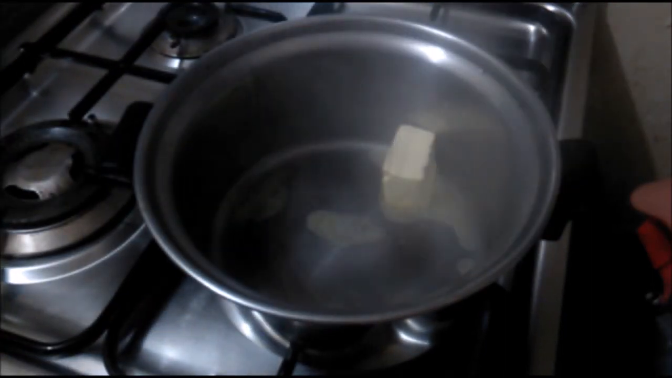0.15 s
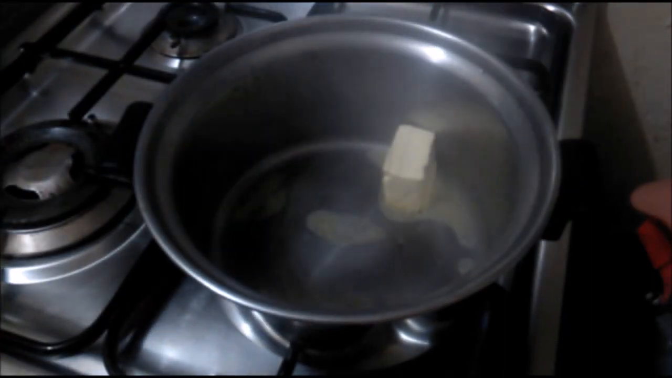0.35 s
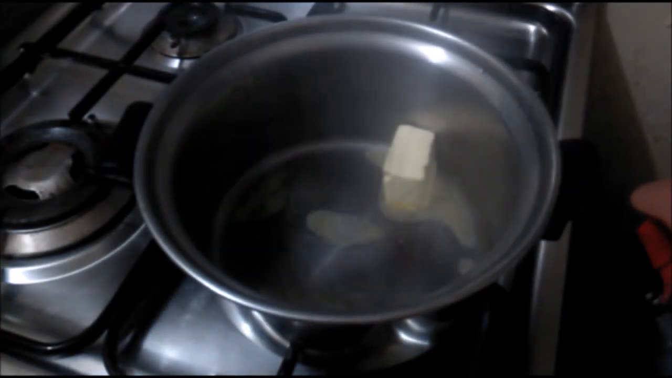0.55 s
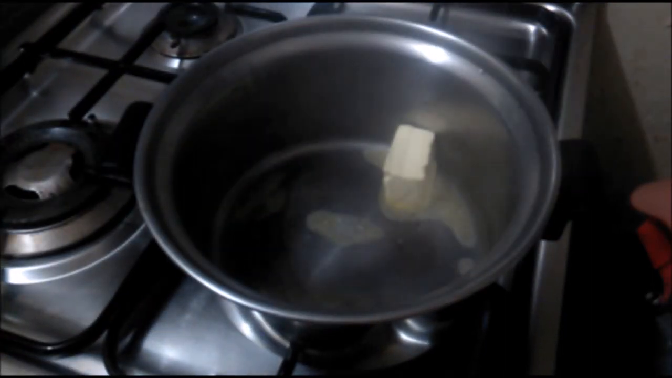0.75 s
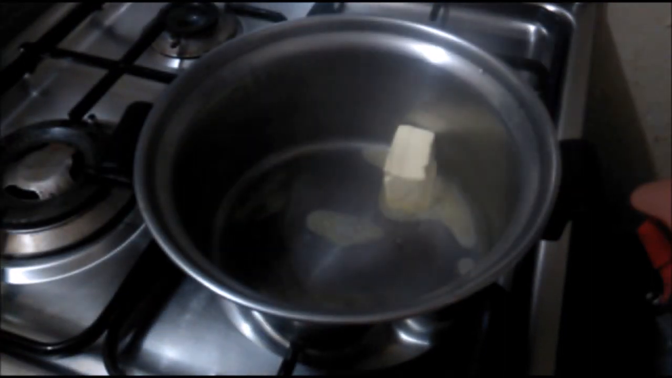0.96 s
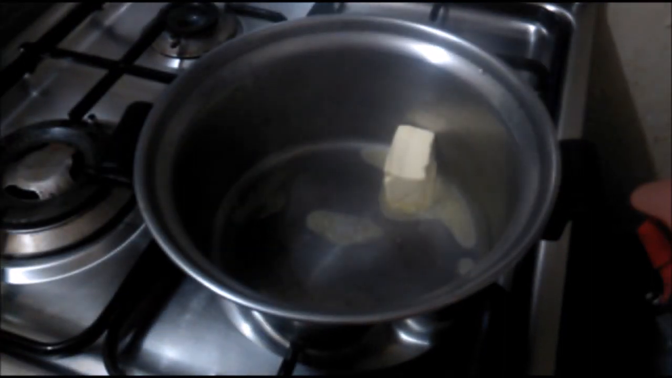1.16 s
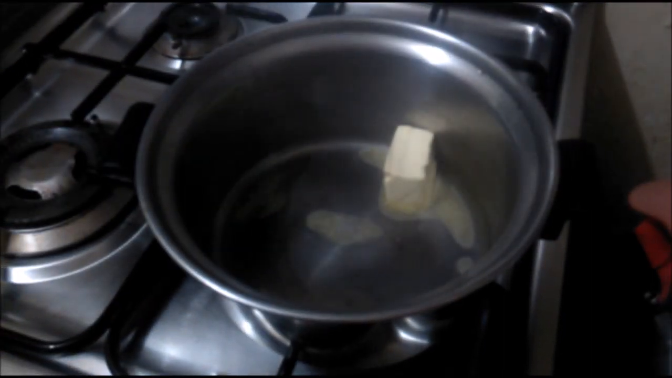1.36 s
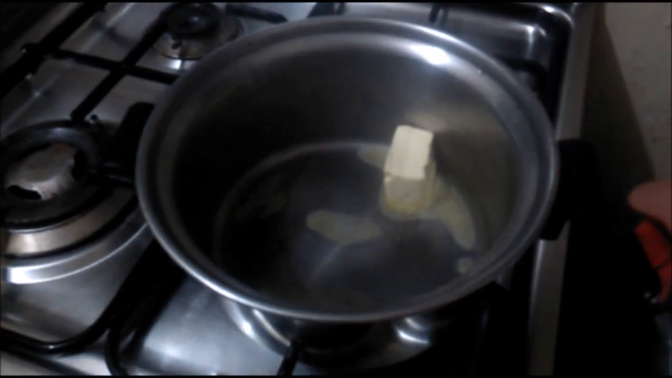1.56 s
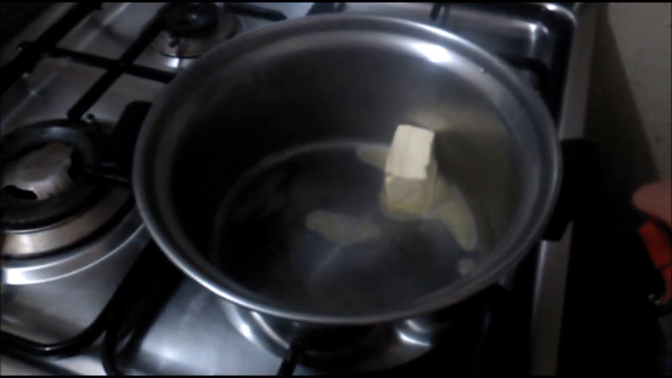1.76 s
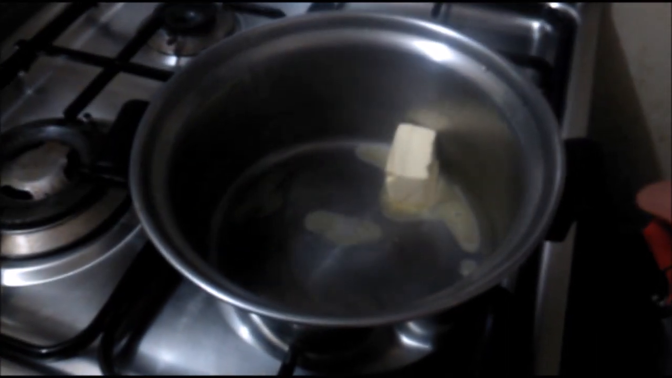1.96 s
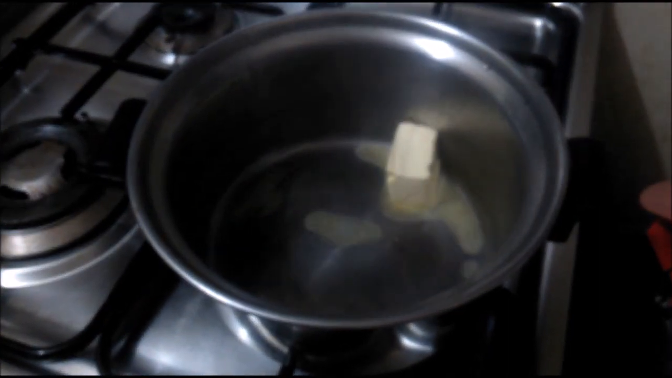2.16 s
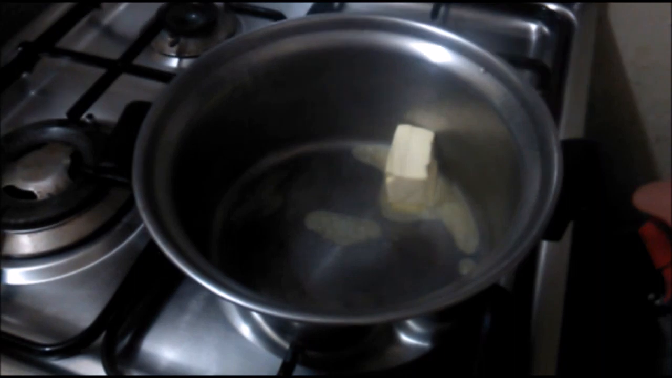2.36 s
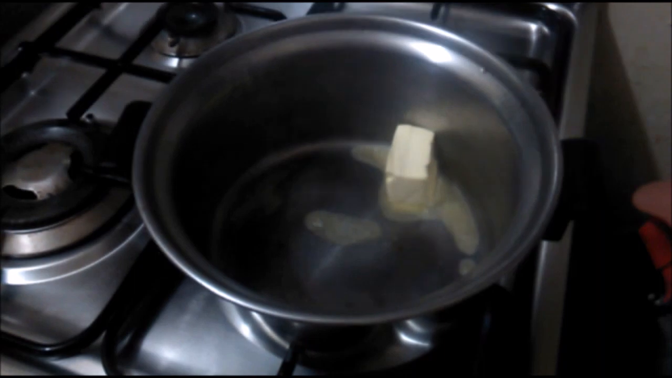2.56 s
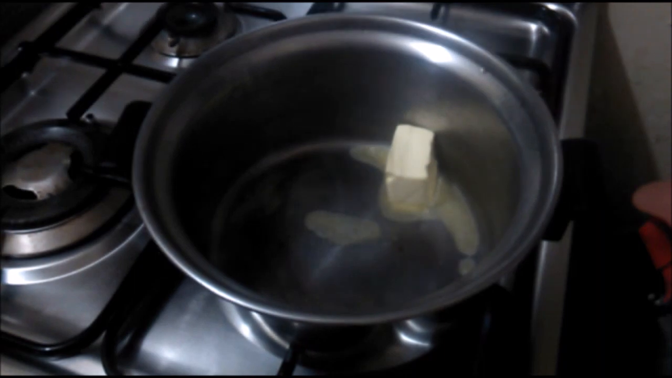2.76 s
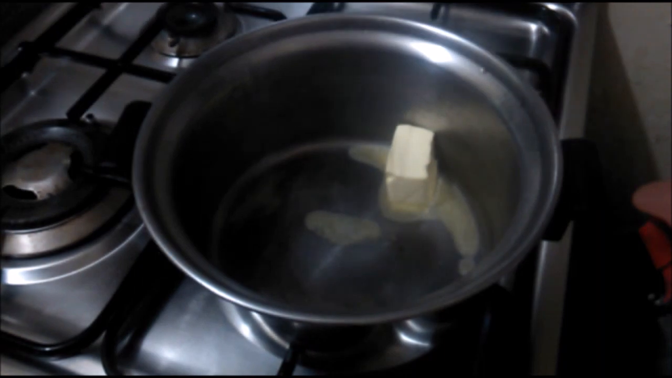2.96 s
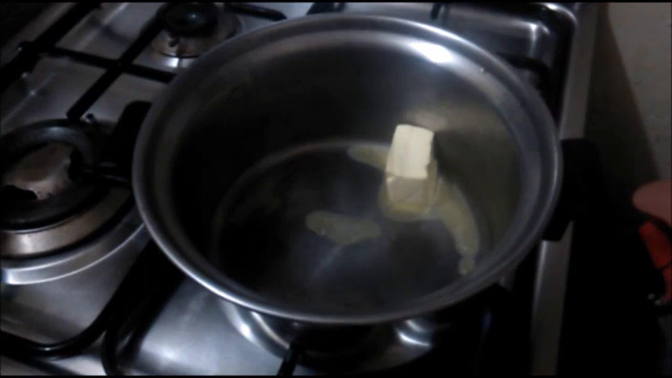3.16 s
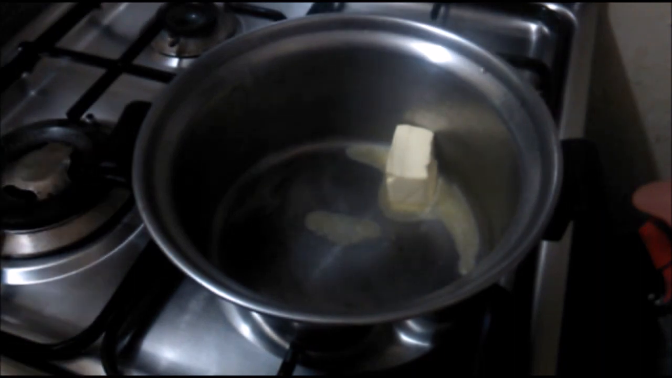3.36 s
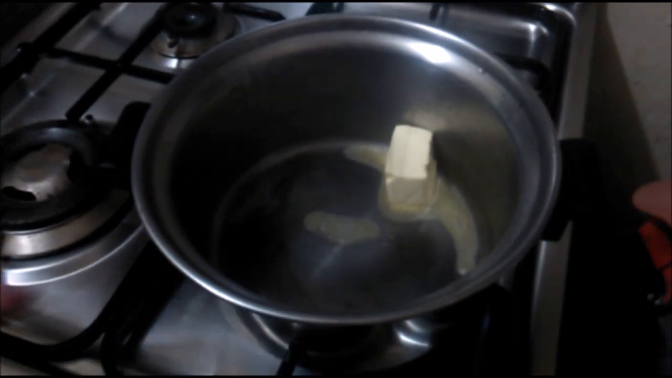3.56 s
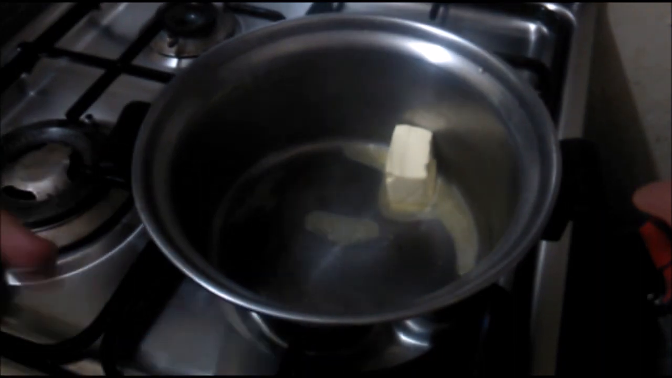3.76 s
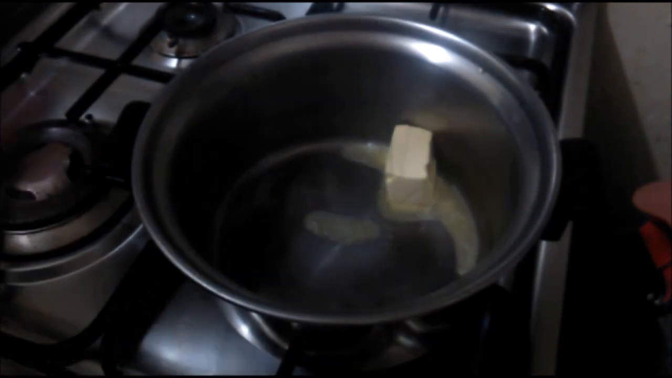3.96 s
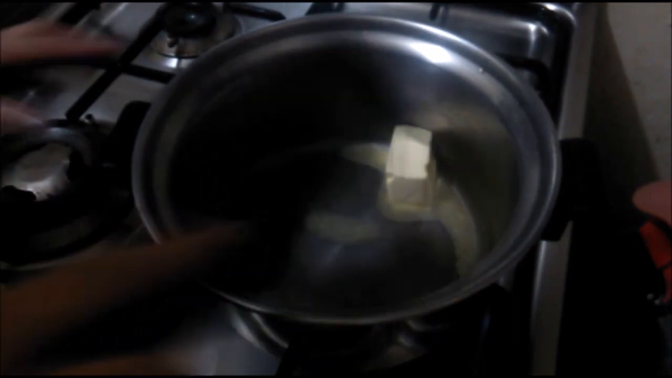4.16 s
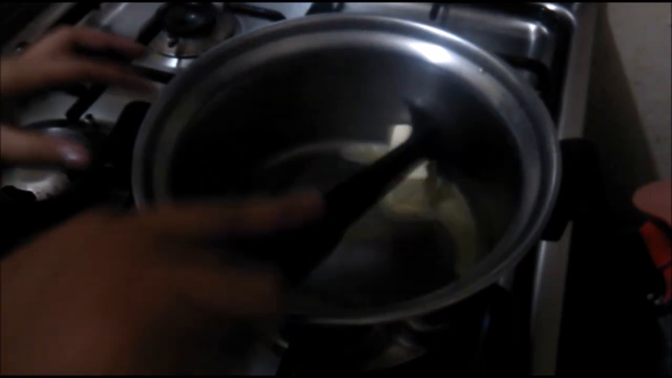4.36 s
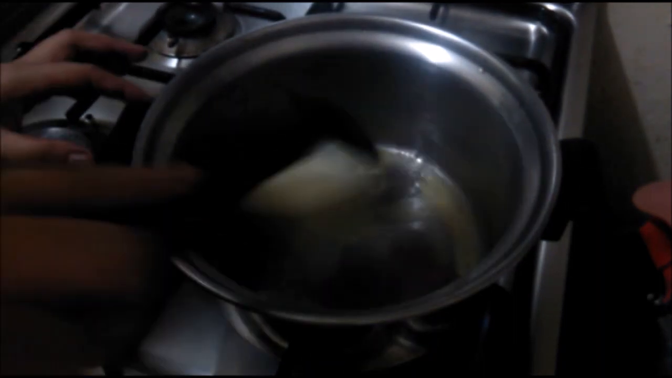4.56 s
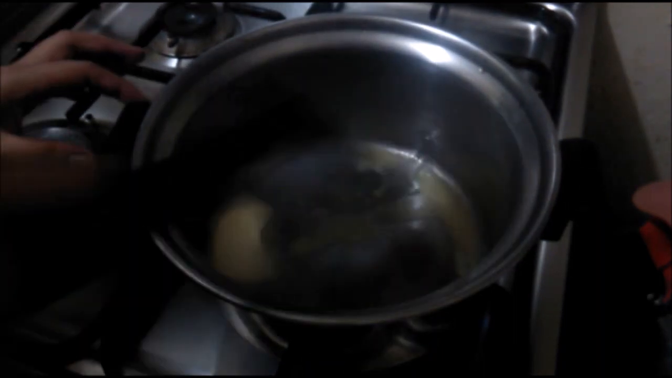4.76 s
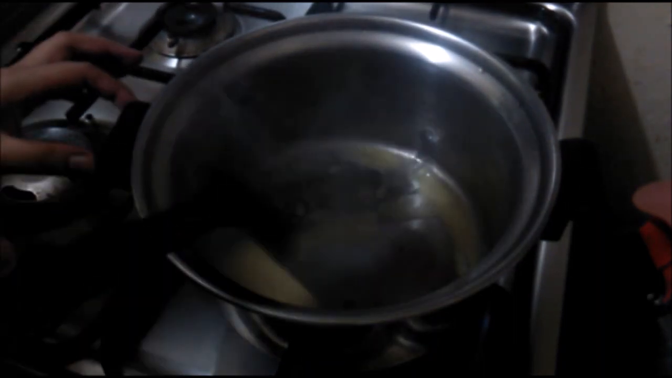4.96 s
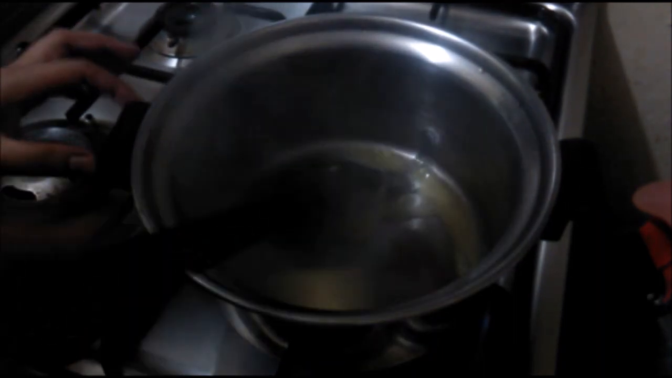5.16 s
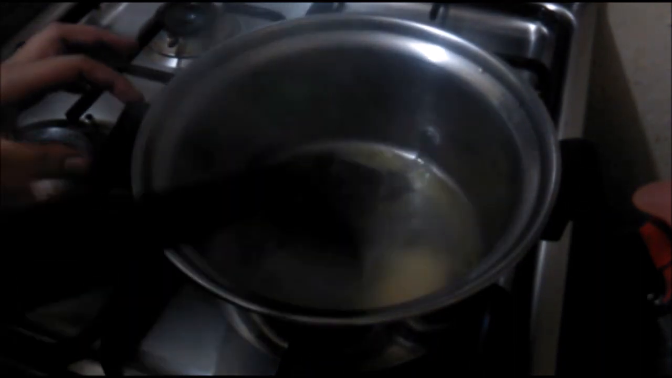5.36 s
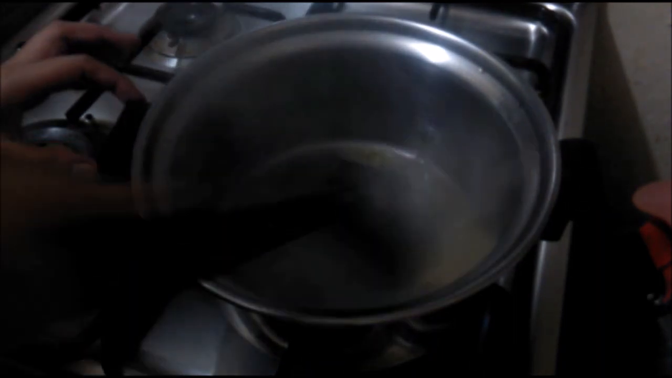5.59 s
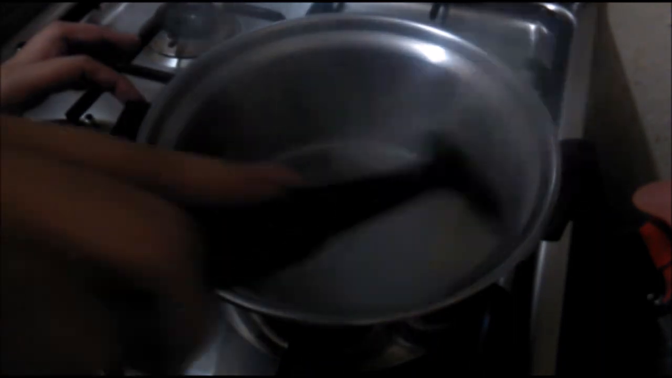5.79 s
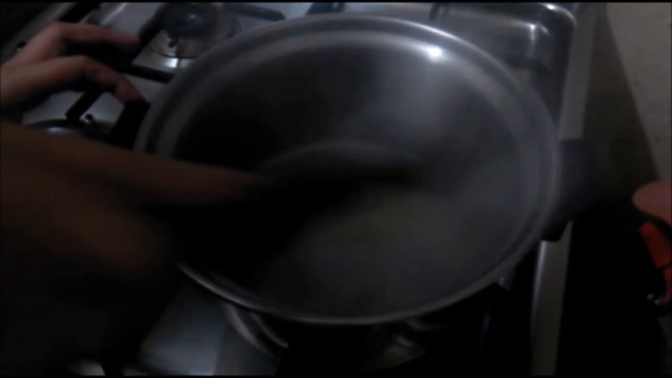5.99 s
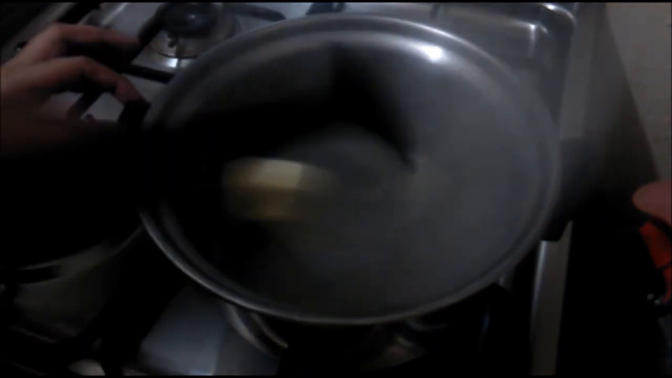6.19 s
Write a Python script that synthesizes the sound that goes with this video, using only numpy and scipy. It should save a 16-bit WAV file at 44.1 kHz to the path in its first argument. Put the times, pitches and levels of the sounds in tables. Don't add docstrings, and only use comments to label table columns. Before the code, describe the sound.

A thin, airy sizzle runs throughout, dotted with crackling pops and a few lower plops. Small counter noises interrupt: cloth rubbing, a metallic slide, hollow thumps. After four seconds the butter is pushed around and the frying surges; the spatula clanks and scrapes on hollow steel, then stirs softly. Close, dry mono kitchen sound with low room rumble and momentary dull, gritty dropouts from the camera.

```python
import sys
import numpy as np
from scipy import signal
from scipy.fft import rfft, irfft, next_fast_len
from scipy.io import wavfile
from scipy.ndimage import uniform_filter1d, map_coordinates

SR = 44100
rng = np.random.default_rng(int(sys.argv[2]) if len(sys.argv) > 2 else 0)


def pcm_store(signal):
    levels = np.round(np.clip(np.atleast_2d(signal), -1, 1) * 32767)
    wavfile.write(sys.argv[1], SR, levels.astype(np.int16).T)


def attenuation_scalar(level_db):
    decades = np.asarray(level_db, float) / 20
    return 10 ** decades


N = 274743

# [f/Hz, level/dB per Hz]
ROOM_COLOUR = [(13, -38), (22, -27), (70, -3), (119, -5), (143, -12.5), (167, -12.5), (197, -17),
               (262, -13.5), (360, -16), (411, -18), (584, -20), (982, -27), (1200, -44), (1560, -51),
               (2640, -120)]
# [f/Hz, level/dB]
FRIDGE_LINES = [(58.01, -58), (56.3, -59), (119.8, -53), (116.06, -58.5)]
BEAT_NULLS = [
    .59,
    .165,
]
# [t/s, f/Hz, level/dB]
PIPE_WHINE = [
    (.55, 253, -80),
    (.65, 265.7, -61),
    (.82, 265, -59),
    (.95, 295, -83),
]
# [t/s, peak level/dB, bass over it/dB, hollow note f/Hz]
THUDS = [(0.788, -48.5, 10.5, 272), (2.811, -34.5, -6, 300), (2.838, -40, -1, 496), (2.89, -44.5, -4, 530),
         (2.919, -46, 1, 312), (3.162, -43, 3, 620), (3.198, -50, -8, 700), (3.249, -50, -2, 473),
         (4.48, -44.5, 6, 514), (4.554, -34.5, -19, 348), (4.579, -41.5, -17, 458), (4.69, -37.5, 3.5, 480),
         (4.807, -52, 14, 574), (5.3, -46, 2, 326), (5.398, -24.5, -11, 310), (5.497, -35.5, -1.5, 322),
         (5.74, -34, -17, 177), (5.759, -43.5, 6.5, 507), (5.797, -44, 8.5, 161), (5.85, -38, -4, 323),
         (5.889, -43, 2, 315), (6.195, -34, -16, 316)]
# [f/Hz, level/dB per Hz]
THUD_COLOUR = [(120, -42), (230, -21), (300, -5.5), (550, -1), (1000, -8.5), (2500, -22), (4000, -23)]
# [t/s, level/dB]
RUBS = [
    [(0.2, -64), (0.212, -49), (0.276, -53), (0.284, -58), (0.344, -48.5), (0.37, -56)],
    [(0.77, -49), (0.782, -33), (0.816, -34), (0.832, -41.5), (0.84, -58), (0.89, -49), (0.92, -52)],
]
# [f/Hz, width/Hz, level/dB]
CLOTH = [(1260, 500, -4), (2500, 360, 3.5), (3150, 640, 0)]
# [f/Hz, width/Hz, level/dB]
CUTLERY = [(770, 33, -16), (1132, 52, -12), (1420, 66, -2), (1480, 33, -11), (1850, 930, -21),
           (2290, 38, -6.5), (2500, 81, -2), (3050, 7.5, 8), (2950, 20, 5), (2820, 1300, -9.5),
           (3620, 71, -8.5), (6230, 170, -12)]
# [f/Hz, level/dB, t60/s]
POT_MODES = [(308, -19, 0.086), (330, -8, .28), (514, -17, 0.19), (774, -7, 0.095), (906.5, -3.5, 0.078),
             (1030, 3, 0.12), (1160, -8, 0.151), (1280, -8, 0.1), (1410, -35, .08), (1696, -5.5, 0.065),
             (1820, -14, 0.16), (2060, -13, 0.047), (2355, -20, .15)]
# [t/s, peak level/dB, note favoured by the spot struck f/Hz]
KNOCKS = [(4.557, -51, 400), (4.667, -23.5, 328), (4.7, -37, 1180), (4.83, -39, 1170), (4.49, -52, 1290),
          (5.14, -42, 1300), (5.351, -27, 1030), (5.373, -22.5, 1030), (5.373, -35, 330),
          (5.399, -22.5, 1060), (5.402, -18, 1750), (5.417, -27, 1040), (5.43, -26, 900),
          (5.433, -28, 1780), (5.438, -30, 325), (5.4926, -34, 1030), (5.515, -33.5, 1030),
          (5.849, -44, 330), (6.196, -39.5, 330)]
# [t/s, level/dB]
DRAG = [
    (5.33, -52),
    (5.38, -41),
    (5.416, -32),
    (5.452, -36),
    (5.464, -45),
    (5.5, -51),
]
# [t/s, level/dB]
STIR = [(4.45, -77), (4.5, -57), (4.85, -56.5), (4.95, -56.5), (5.1, -65.5), (5.3, -49.5), (5.6, -55.5),
        (5.9, -56.5), (6.23, -68)]
# [f/Hz, level/dB per Hz]
GRIT_COLOUR = [(200, -29), (500, -5), (1000, 4), (1400, 6), (2200, -14), (3200, -8), (5000, -54)]
# [t/s, peak level/dB, pitch f/Hz]
SPITS = [(0.1414, -28.5, 7570), (0.4643, -26.5, 6940), (0.4844, -29.5, 7620), (0.8964, -31, 6400),
         (1.1894, -37, 5100), (1.3794, -35, 7880), (1.5344, -31, 5100), (1.563, -31.5, 5250),
         (1.6094, -35, 4300), (1.6394, -36.5, 4450), (1.7504, -28.5, 7300), (1.8994, -29.5, 7100),
          (2.354, -33.5, 5110), (2.491, -35, 5260), (2.593, -23.5, 9300), (2.5986, -36.5, 5150),
         (2.7343, -34, 5370), (2.838, -34, 7500), (3.1264, -28, 6900), (3.1349, -29, 7090),
         (3.129, -37, 5040), (3.3069, -34.5, 4420), (3.4166, -30, 7710), (3.436, -30, 6000),
         (3.4675, -28, 7920), (3.5728, -40, 7610), (4.043, -46, 5080), (4.5035, -22.5, 7250),
         (5.4894, -34, 5190), (5.5766, -31, 5270)]
# [t/s, peak level/dB, pitch f/Hz]
PLOPS = [(1.712, -38.5, 1930), (2.0082, -42, 2410), (2.1695, -43, 3370), (2.2, -36, 2370),
         (2.605, -42, 2160), (2.809, -42, 2110), (2.9997, -46, 1850), (3.0194, -45, 1840),
         (3.269, -38, 3060), (3.3064, -46, 2280), (3.3618, -40, 3360), (3.546, -59, 1960),
         (4.7194, -37, 1680), (5.997, -38, 1920)]
# [t/s, fizz level/dB]
BOIL = [(0.0, -35.5), (0.22, -34.5), (1.3, -35), (1.42, -32), (1.49, -35), (2.2, -35), (2.27, -37.5),
        (2.62, -35), (2.69, -36.5), (3.52, -33.5), (4.44, -35.5), (4.67, -24.5), (5.24, -28), (5.29, -25),
        (5.81, -29.5), (6.07, -28.5), (6.14, -26.5), (6.23, -27)]
# [f/Hz, level/dB per Hz]
FIZZ_COLOUR = [(3530, -38), (6000, -18), (8570, -11.5), (10800, 3), (11900, 2.5), (13200, -4), (14300, -7)]
# [f/Hz, level/dB per Hz]
SPATTER_COLOUR = [(2500, -20), (3600, -13.5), (4300, -11), (5200, -6.5), (6500, -2), (8000, 1), (9500, 5),
                  (12000, -51)]
# [f/Hz, level/dB per Hz]
RUSTLE_COLOUR = [(180, -5), (300, -15.5), (482, -5), (588, -3.5), (956, -9.5), (1270, -5.5), (1610, -9),
                 (2530, -2.5), (2890, -6), (4200, -2.5), (5460, -50), (9240, -120)]
# [f/Hz, width/Hz, level/dB]
POT_BOTTOM = [(1257, 70, 6.5), (1833, 79, 1), (4410, 55, 1.5), (5080, 200, -1)]
THINNINGS = [.849, 1.244, 1.685, 1.801, 3.148, 4.1, 4.168, 4.309, 4.47, 4.634, 4.796, 5.121, 5.236, 5.445,
             5.539, 5.562, 6.142]


def unit(x):
    return x / np.sqrt(np.mean(x ** 2) + 1e-20)


def along(points, hz):
    f, v = np.transpose(points)
    return np.interp(np.log(hz + 1), np.log(f + 1), v, -120, -120)


def curves(rows):
    s, *columns = np.transpose(rows)
    return [np.interp(np.arange(N) / SR, s, c, -120, -120) for c in columns]


def wobble(rate):
    knots = rng.standard_normal(int(N * rate / SR) + 4)
    return map_coordinates(knots, [np.arange(N) * rate / SR])


def add_at(out, s, sound):
    out[round(s * SR):][:len(sound)] += sound


def filtered(x, response):
    m = next_fast_len(len(x) + SR // 2)
    return irfft(rfft(x, m) * response(np.fft.rfftfreq(m, 1 / SR)), m)[:len(x)]


def resonances(peaks, f):
    total = 0
    for k, (centre, width, db) in enumerate(peaks):
        damping = 1j * f * width
        total = total + (-1) ** k * attenuation_scalar(db) * damping / (centre * centre - f * f + damping)
    return total


def driven(level_db, force, response):
    return filtered(attenuation_scalar(level_db) * force, response) / np.std(filtered(force, response))


def bursts(per_second, spread_db, share):
    chance = rng.random(N)
    size, side, noise = rng.standard_normal((3, N))
    pops = (chance < per_second / SR) * attenuation_scalar(spread_db * np.clip(size, -2, 2)) * np.sign(side)
    return np.sqrt(share) * unit(pops) + np.sqrt(1 - share) * noise


def patchy(x, depth_db, bins, frames):
    z = signal.stft(x, nperseg=256)[2]
    field = uniform_filter1d(rng.standard_normal(z.shape), bins, 0)
    field = uniform_filter1d(field, frames, 1)
    return signal.istft(z * attenuation_scalar(depth_db * unit(field)), nperseg=256)[1][:N]


def kitchen():
    t = np.arange(N) / SR
    hum = np.zeros(N)
    for k, (hz, db) in enumerate(FRIDGE_LINES):
        hum += (-1) ** k * np.sqrt(2) * attenuation_scalar(db) * np.sin(2 * np.pi * hz * (t - BEAT_NULLS[k // 2]))
    whine_hz, whine_db = curves(PIPE_WHINE)
    whine = attenuation_scalar(whine_db) * np.sin(2 * np.pi * np.cumsum(whine_hz) / SR)
    rumble = unit(filtered(rng.standard_normal(N), lambda f: attenuation_scalar(along(ROOM_COLOUR, f))))
    return attenuation_scalar(-0.5) * hum + whine + attenuation_scalar(-58) * rumble


def counter():
    out, t = np.zeros(N + SR), np.arange(SR // 4) / SR
    body_t60_s, bass_t60_s, attack_s = 0.2, 0.5, 0.0039
    noises = rng.standard_normal((len(THUDS), 2, len(t)))
    for (s, db, bass_db, hz), (body_noise, bass_noise) in zip(THUDS, noises):
        hollow = lambda f: np.abs(resonances([(hz, 70, 0)], f)) ** 2
        body = unit(filtered(body_noise, lambda f: 0.42 * attenuation_scalar(along(THUD_COLOUR, f)) + hollow(f)))
        bass = unit(filtered(bass_noise, lambda f: resonances([(84, 23, 0)], f)))
        body_gain = attenuation_scalar(db - 6.0 - 60 * t / body_t60_s) * (1 - np.exp(-t / attack_s))
        bass_gain = attenuation_scalar(db + bass_db - 9.5 - 60 * t / bass_t60_s)
        add_at(out, s, body_gain * body + bass_gain * bass)
    for span, peaks in zip(RUBS, (CLOTH, CUTLERY)):
        friction = bursts(per_second=500, spread_db=2, share=0.73)
        out[:N] += driven(curves(span)[0], friction, lambda f: resonances(peaks, f))
    return out[:N]


def knocks():
    out, t = np.zeros(N + SR), np.arange(SR // 2) / SR
    all_luck = rng.standard_normal((len(KNOCKS), len(POT_MODES)))
    for (s, db, spot_hz), luck in zip(KNOCKS, all_luck):
        ring = np.zeros(len(t))
        for (hz, level, t60), luck_db in zip(POT_MODES, luck):
            mode_db = level - 19.2 * np.abs(np.log2(hz / spot_hz)) + luck_db
            phase = 2 * np.pi * hz * (t + round(s * SR) / SR)
            ring += attenuation_scalar(mode_db - 60 * t / t60) * np.sin(phase)
        add_at(out, s, attenuation_scalar(db) * ring / np.abs(ring).max() * (1 - np.exp(-t / 0.0018)))
    return out[:N]


def spatula():
    modes = [(hz, np.log(1000) / (np.pi * t60), level) for hz, level, t60 in POT_MODES]
    steel = lambda f: resonances(modes, f) + 0.1 * attenuation_scalar(along(GRIT_COLOUR, f))
    scratch = bursts(per_second=300, spread_db=-0.5, share=0.5)
    drag = driven(curves(DRAG)[0] + 4, scratch, lambda f: steel(f) * f / (f + 1500))
    stir = driven(curves(STIR)[0], rng.standard_normal(N), lambda f: steel(f) / (1 + 1j * f / 300) ** 2)
    return knocks() + drag + stir


def spits():
    out, t = np.zeros(N + SR), np.arange(SR // 10) / SR
    spit_fall_s, plop_fall_s, snap_db = 0.069, 0.04, 10
    rows = [(*r, spit_fall_s) for r in SPITS] + [(*r, plop_fall_s) for r in PLOPS]
    click = 1. * (t == 0)
    for (s, db, hz, t60), noise in zip(rows, rng.standard_normal((len(rows), len(t)))):
        puff = unit(filtered(noise, lambda f: resonances([(hz, 0.38 * hz, 0)], f) ** 2))
        puff = attenuation_scalar(-45 * t / t60) * (1 - np.exp(-t / 0.0013)) * puff
        snap = filtered(click, lambda f: resonances([(hz, 1.2 * hz, 0)], f))
        add_at(out, s, attenuation_scalar(db - 7.5) * (puff + attenuation_scalar(snap_db) * snap / np.abs(snap).max()))
    return out[:N]


def frying():
    (fizz_db,), (sweep_db,) = curves(BOIL), curves(STIR)
    boil_db = fizz_db + 35
    fizz_gain = attenuation_scalar(fizz_db + 0.42 + 0.21 * wobble(6))
    spatter_gain = attenuation_scalar(-44 + 0.56 * boil_db + 2 * wobble(8))
    rustle_gain = attenuation_scalar(-58.5 + 0.72 * boil_db - 0.85 * wobble(8))
    rustle_gain = rustle_gain + attenuation_scalar(sweep_db + 2.5)
    fizz = patchy(bursts(per_second=5400, spread_db=1.5, share=0.27), depth_db=1.08, bins=12, frames=6)
    spatter = patchy(bursts(per_second=1500, spread_db=16.0, share=0.17), depth_db=2.5, bins=10, frames=10)
    rustle = patchy(bursts(per_second=300, spread_db=5.0, share=0.16), depth_db=2.5, bins=8, frames=8)

    def in_pot(x, colour):
        pot = lambda f: 1 + np.abs(resonances(POT_BOTTOM, f))
        return unit(filtered(x, lambda f: attenuation_scalar(along(colour, f)) * pot(f)))

    out = fizz_gain * in_pot(fizz, FIZZ_COLOUR)
    out += spatter_gain * in_pot(spatter, SPATTER_COLOUR)
    return out + rustle_gain * in_pot(rustle, RUSTLE_COLOUR)


def scene():
    return np.tile(kitchen() + counter() + spatula() + spits() + frying(), (2, 1))


def thinned(x):
    size, offset, bins, kept = 1024, 555, 640, 16
    n, k = np.arange(2 * size)[:, None] + .5, np.arange(bins) + .5
    window = np.sin(np.pi * n / (2 * size))
    basis = np.sqrt(2 / size) * window * np.cos(np.pi / size * (n + size / 2) * k)
    care = 1 + 1.7 / (1 + (k / 240) ** 4)
    out = x.copy()
    for s in THINNINGS:
        start = offset + size * (round((s * SR - offset) / size) - 1)
        tones = x[start:start + 2 * size] @ basis * care
        strength = np.abs(tones)
        edge = np.sort(strength)[-kept]
        step = 2.0 * edge
        coarse = np.sign(tones) * step * np.maximum(1, np.round(strength / step)) * (strength >= edge)
        out[start:start + 2 * size] += basis @ ((coarse - tones) / care)
    return out


def band_limit(x):
    return signal.sosfilt(signal.butter(12, 15560, fs=SR, output="sos"), x)


def record(dry):
    mono = thinned(filtered(dry[0], lambda f: f < 14270))
    return band_limit(np.tile(mono, (2, 1)))


dry = scene()
out = record(dry)
pcm_store(out)
```